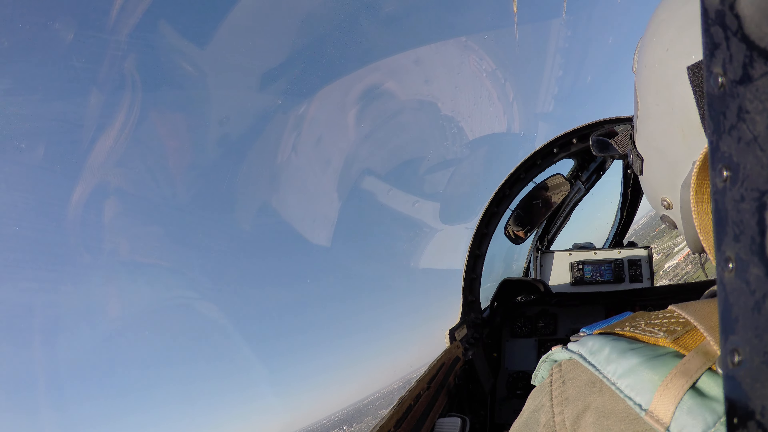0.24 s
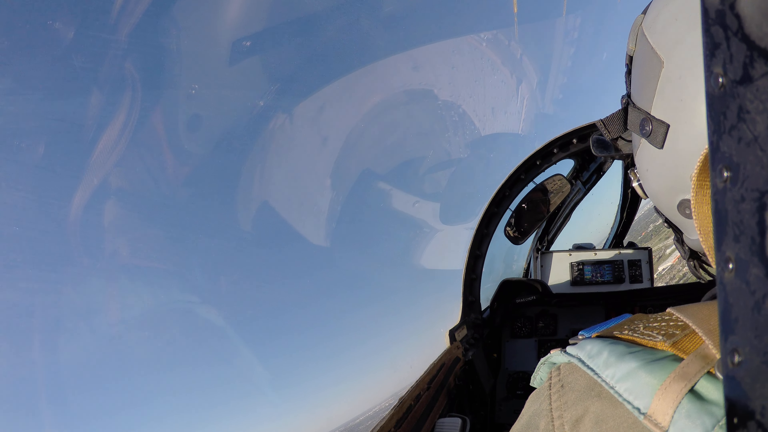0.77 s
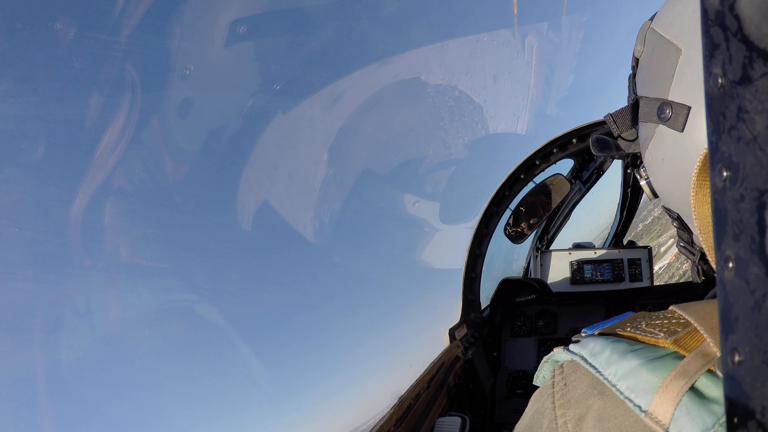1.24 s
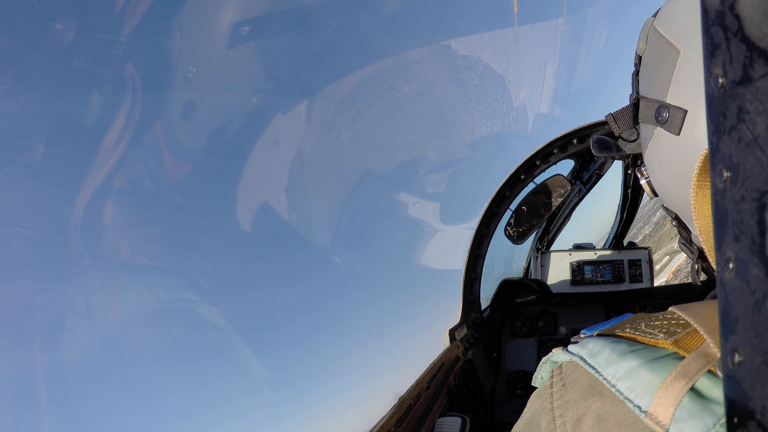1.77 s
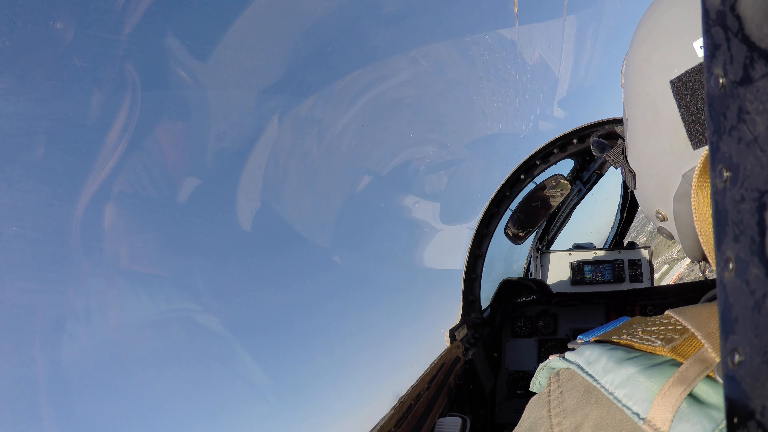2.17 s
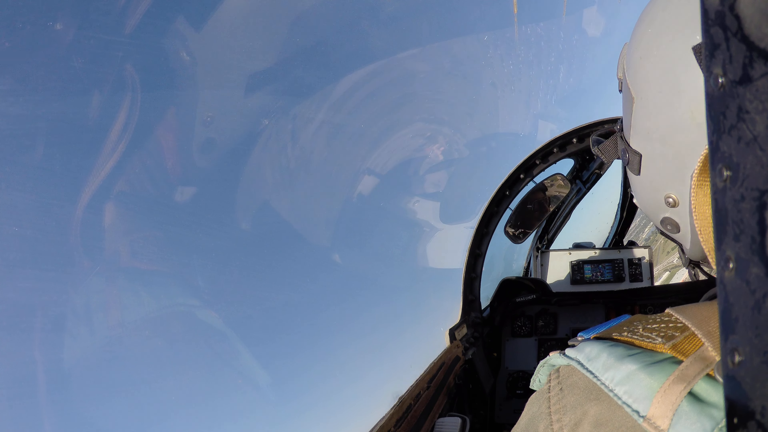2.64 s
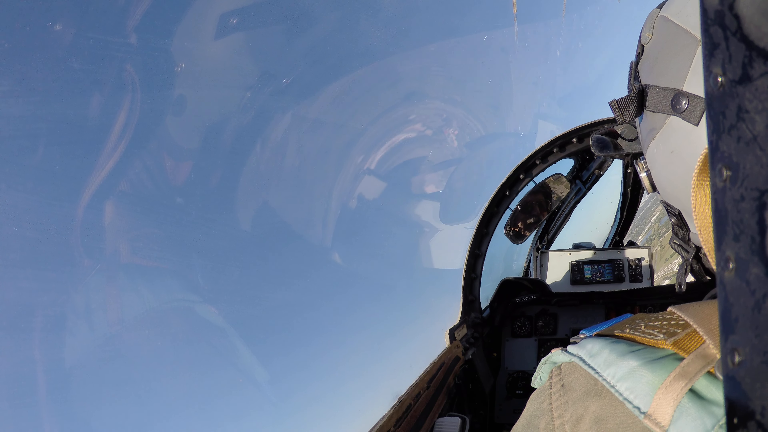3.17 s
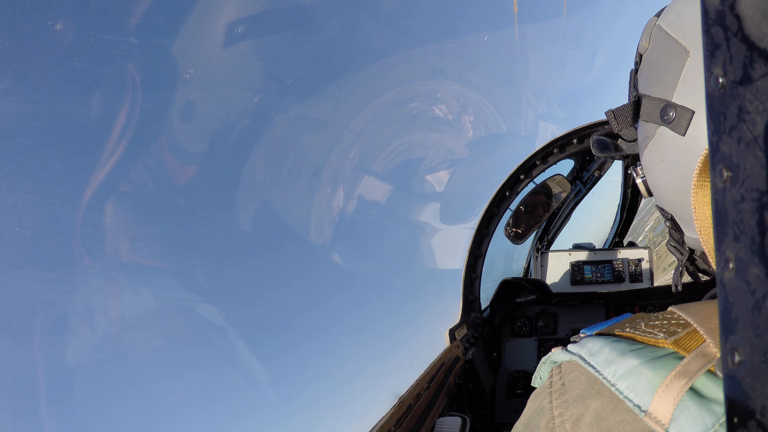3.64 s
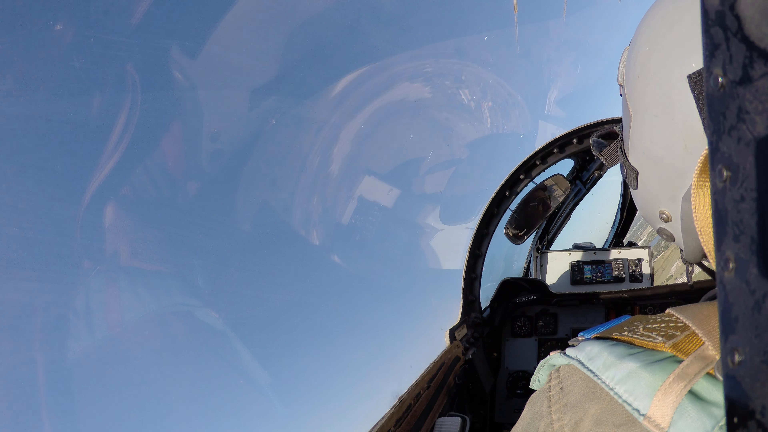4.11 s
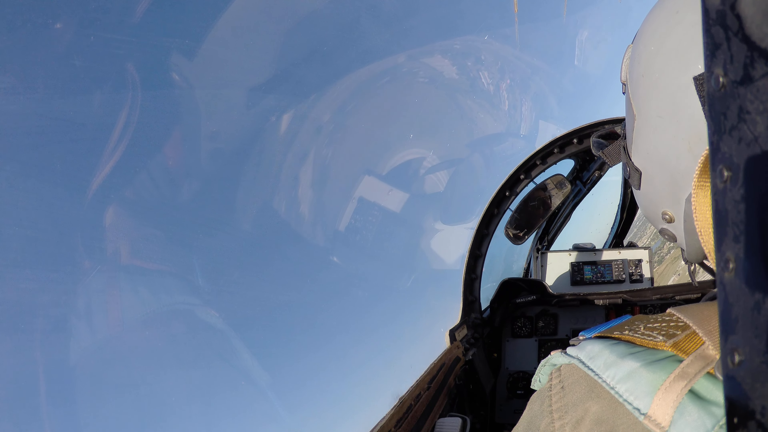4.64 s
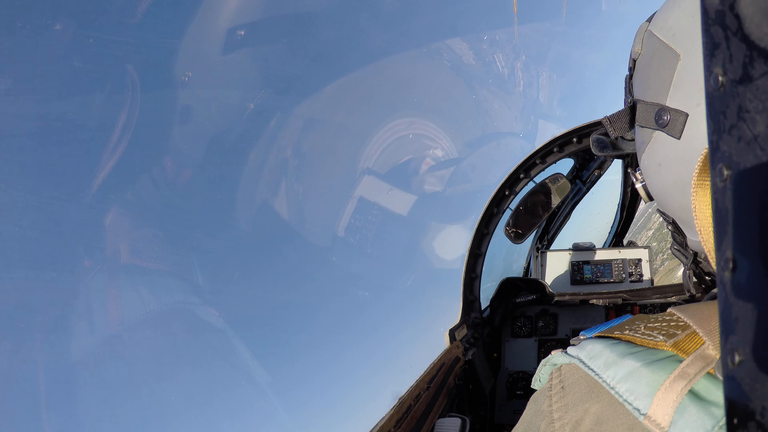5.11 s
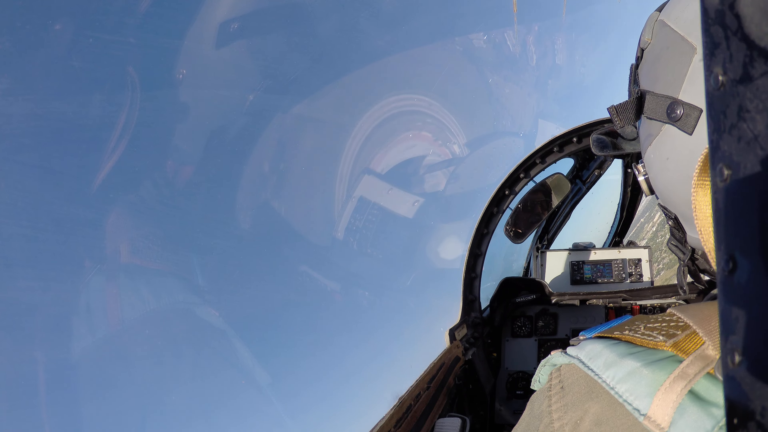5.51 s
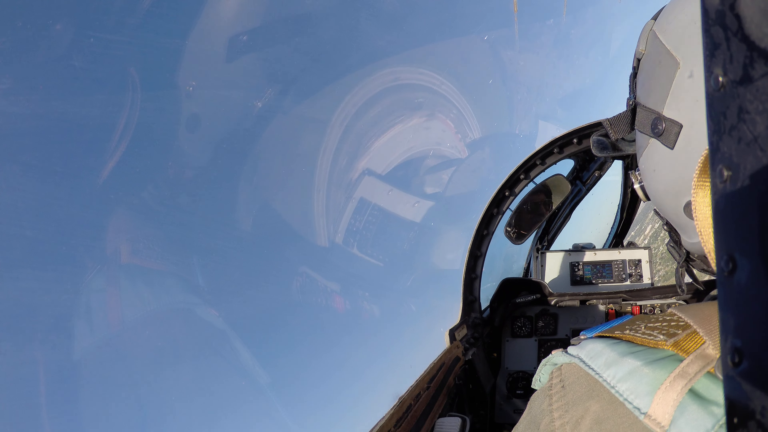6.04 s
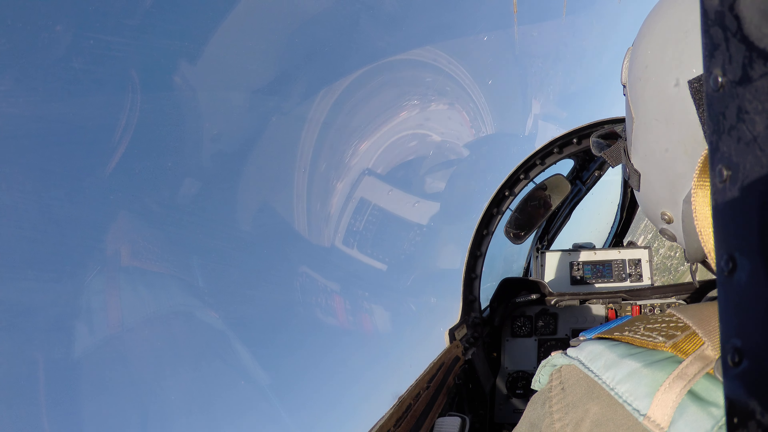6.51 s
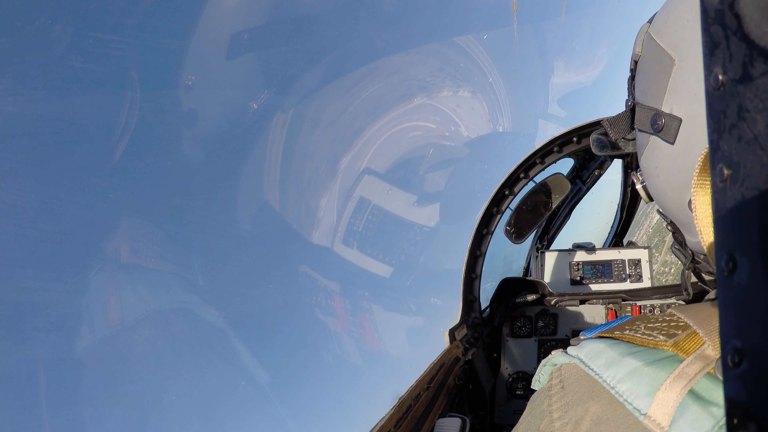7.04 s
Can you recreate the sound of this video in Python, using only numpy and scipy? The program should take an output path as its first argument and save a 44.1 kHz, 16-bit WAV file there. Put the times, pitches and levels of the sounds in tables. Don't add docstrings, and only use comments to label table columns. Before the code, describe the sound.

A jet cruises, heard from within its cabin by a small enclosed microphone. Dense, hissy wind noise with a hollow, nasal ring stays nearly level throughout. Low rumble and sub-bass shudders swell several times a second, strongest near the middle and again late. A steady turbine whine rises almost at once, flickers, briefly vanishes, returns, then sinks a little. There is no clear beginning or ending.

```python
import sys
import numpy as np
from scipy import signal
from scipy.fft import rfft, irfft
from scipy.io import wavfile
from scipy.ndimage import uniform_filter1d

SR = 44100
rng = np.random.default_rng(int(sys.argv[2]) if len(sys.argv) > 2 else 0)


def pcm_store(signal):
    levels = np.round(np.clip(np.atleast_2d(signal), -1, 1) * 32767)
    wavfile.write(sys.argv[1], SR, levels.astype(np.int16).T)


def natural_amplitude(level_db):
    exponent = np.asarray(level_db, float) / 20
    return 10 ** exponent


N = 321048


def curve(table, column):
    rows = np.array(table)
    return np.interp(np.arange(N) / SR, rows[:, 0], rows[:, column])


def walk(rate):
    hold = int(SR / rate)
    held = np.repeat(rng.standard_normal(N // hold + 1), hold)
    slewed = uniform_filter1d(held, hold)
    return uniform_filter1d(slewed, hold)[:N]


def air(spectrum, modes):
    hz = np.maximum(np.arange(N // 2 + 1) * SR / N, 1)
    points = np.array(spectrum)
    db = np.interp(np.log(hz), np.log(points[:, 0]), points[:, 1], left=-200, right=-200)
    for centre, width, lift in modes:
        db = db + lift * np.exp(-0.5 * ((hz - centre) / width) ** 2)
    white = rfft(rng.standard_normal(N))
    return irfft(white * natural_amplitude(db), N) * np.sqrt(SR / 2)


def steady(noise, db):
    return noise / np.sqrt(np.mean(noise ** 2)) * natural_amplitude(db)


def tone(turns, db):
    return np.sqrt(2) * natural_amplitude(db) * np.sin(2 * np.pi * turns)


# (frequency [Hz], level [dB per Hz])
EDDY_SPECTRUM = [(17, -66), (22, -54), (27, -49), (30, -47), (38, -45), (44, -40), (48, -43), (54, -52)]


def eddies():
    return air(EDDY_SPECTRUM, [])


# (frequency [Hz], level [dB per Hz])
BUFFET_SPECTRUM = [(12, -70), (22, -66), (29, -43), (38, -41.5), (50, -40), (67, -43), (75, -54.5),
                   (100, -56), (124, -58), (133, -67), (145, -73), (200, -70.5), (300, -70.5), (340, -100)]
# (frequency [Hz], width [Hz], lift [dB])
MOUNT_MODES = [(66.3, 1.5, 3.2), (229, 11, 1.2), (112.3, 4, 7.2), (169.8, 10.1, 11.2), (274.3, 6.3, 9.4)]


def buffeting():
    return air(BUFFET_SPECTRUM, MOUNT_MODES)


# (time [s], frequency [Hz], level [dB])
GEAR_WHINE = [(0.0, 1133, -40), (0.1, 1133, -43), (0.36, 1137, -33.5), (1.9, 1137, -34.5),
              (2.19, 1138, -31), (2.57, 1137, -34), (4.97, 1136, -34), (5.09, 1136, -43),
              (5.33, 1137, -30.5), (5.61, 1137, -36), (7.22, 1136, -36.5), (7.28, 1137, -35)]
# (time [s], level [dB])
SHAFT_HUM = [
    (0, -29.5),
    (1.3, -31),
    (2, -29.5),
    (2.6, -31),
    (3.7, -28),
    (4.6, -35.5),
    (5.5, -35),
    (6, -29.5),
    (6.4, -36.5),
    (7.28, -32),
]
# (multiple of shaft speed [1], level [dB])
OTHER_ORDERS = [(3, -65), (9, -55.5), (15, -62), (27, -34)]


def fast_shaft():
    turns = np.cumsum(curve(GEAR_WHINE, column=1)) / SR / 12
    hum = tone(turns, curve(SHAFT_HUM, column=1))
    wobble = 0.12 * walk(8)
    whine_db = curve(GEAR_WHINE, column=2) + 1.5 * walk(9) - 0.5
    whine = tone(12 * turns + wobble, whine_db)
    orders = np.zeros(N)
    for multiple, db in OTHER_ORDERS:
        orders += tone(int(multiple + 0.5) * turns + wobble, db + 3 * walk(3))
    return hum + whine + orders


# (time of height [s], level [dB], bending frequency [Hz])
GUST_SWINGS = [(0.24, -15.5, 31.9), (0.571, -15.2, 34.5), (0.623, -19.6, 37.9), (0.823, -18, 32.4),
               (1.257, -15.5, 35.3), (1.462, -18, 31.8), (1.761, -15.2, 32.66), (2.105, -17, 40.35),
               (2.374, -16, 32.1), (2.43, -21.5, 46), (2.923, -15.5, 33.9), (2.987, -19, 31.8),
               (3.322, -13.5, 33.7), (3.518, -19, 36.9), (3.996, -16.5, 37.6), (4.227, -14, 33.14),
               (4.28, -20, 37), (4.567, -14, 34.56), (4.847, -15.5, 37.4), (4.956, -15.9, 36.34),
               (4.987, -14.5, 32.25), (5.38, -17.5, 37.3), (5.501, -15, 32.5), (5.808, -18.5, 33),
               (6.047, -20, 47.6), (6.349, -12.0, 32.9), (6.69, -16.5, 34.2), (6.748, -28, 39.3),
               (7.111, -16.0, 31.3), (7.123, -21.5, 38.2)]
SWELL_S = 0.13
SLOW_SHAFT_HZ, SLOW_SHAFT_DB = 41.875, -20.8


def throb():
    t = np.arange(N) / SR
    shaft_turns = SLOW_SHAFT_HZ * t
    swings = np.zeros(N)
    for height_s, db, bending_hz in GUST_SWINGS:
        since = t - height_s
        turns = shaft_turns - (SLOW_SHAFT_HZ - bending_hz) * since
        swings += tone(turns, db) * np.exp(-0.5 * (since / SWELL_S) ** 2)
    return swings + tone(shaft_turns, SLOW_SHAFT_DB)


# (frequency [Hz], level [dB per Hz])
HISS_SPECTRUM = [(3650, -96), (3830, -74), (6400, -71.5), (6900, -73), (7250, -78), (9000, -81),
                 (10100, -82), (11200, -85), (12900, -84.5), (13500, -90), (14200, -90), (14700, -94),
                 (15270, -93), (15340, -120)]
# (frequency [Hz], width [Hz], lift [dB])
HISS_RESONANCES = [(4060, 107, 5.3), (4444, 84, 5.2), (4784, 68, 5.3), (5066, 123, 4.9), (5220, 56, 3.2),
                   (5570, 89, 4.1), (6000, 140, 5.1), (6470, 40, 2), (6650, 40, 4), (6870, 50, 3),
                   (7560, 200, 3), (8440, 200, 2), (9320, 150, 2.8), (9700, 150, 2), (10750, 250, 3.7),
                   (11740, 90, 5), (12500, 60, 2)]


def hiss(rush_db):
    return steady(air(HISS_SPECTRUM, HISS_RESONANCES), rush_db - 16 + 0.4 * walk(30))


# (frequency [Hz], level [dB per Hz])
CABIN_SPECTRUM = [(270, -103), (310, -72.5), (450, -72.5), (745, -73.5), (900, -67), (1150, -62),
                  (1450, -65), (1780, -65.5), (2050, -62), (2250, -61), (2400, -78)]
# (frequency [Hz], width [Hz], lift [dB])
CABIN_RESONANCES = [(356, 13.6, 4.9), (397, 11, 3.6), (529, 34, 7.1), (631, 36, 4.2), (706, 8.3, 3),
                    (859, 10, 2.3), (914, 15, 2), (970, 18, 4.8), (1070, 47, 0.65), (1262, 19, 3.8),
                    (1326, 42, 3.2), (1425, 16, 3.6), (1564, 63, 2.9), (1700, 40, 1.7), (1850, 31, 2.2),
                    (2115, 23, 2.1), (2190, 36, 5.1)]


def cabin(rush_db):
    return steady(air(CABIN_SPECTRUM, CABIN_RESONANCES), rush_db - 12.5 + 0.5 * walk(9.2))


# (frequency [Hz], level [dB per Hz])
CASE_SPECTRUM = [(2150, -83), (2300, -59), (2480, -45), (2780, -46.5), (2900, -53), (3100, -54),
                 (3250, -53.5), (3610, -53), (3720, -60.5), (3800, -65), (3850, -94)]
# (frequency [Hz], width [Hz], lift [dB])
CASE_RESONANCES = [(2366, 26, 2.7), (2563, 47, 3.3), (2700, 64, 1.3), (2942, 35, 5.9), (3147, 28, 2.8),
                   (3270, 23, 1.8), (3250, 25, 2.6), (3446, 26, 3), (3573, 38, 2)]


def case_cavity(rush_db):
    return steady(air(CASE_SPECTRUM, CASE_RESONANCES), rush_db + 0.3 * walk(30))


# (time [s], level [dB])
RUSH_LEVEL = [
    (0, -15.5),
    (.4, -16.5),
    (1.6, -17),
    (2.8, -16.5),
    (4, -16.5),
    (5, -17),
    (6.2, -17),
    (7.28, -17),
]


def rush():
    rush_db = curve(RUSH_LEVEL, column=1)
    return hiss(rush_db) + cabin(rush_db) + case_cavity(rush_db)


def scene():
    background = eddies() + buffeting()
    mix = background + fast_shaft() + throb() + rush()
    return mix[None]


def top_cut(x):
    return signal.sosfilt(signal.butter(12, 15330, fs=SR, output="sos"), x)


def record(dry):
    mix = dry / (1 + np.abs(dry / 0.95) ** 6) ** (1 / 6)
    return top_cut(mix)


dry = scene()
out = record(dry)
pcm_store(out)
```